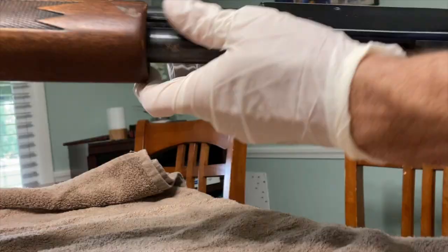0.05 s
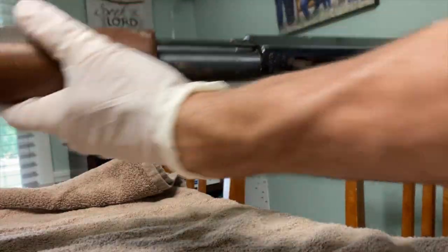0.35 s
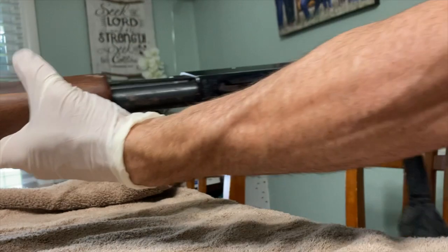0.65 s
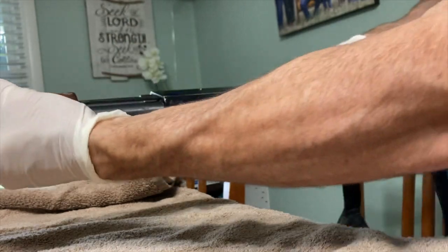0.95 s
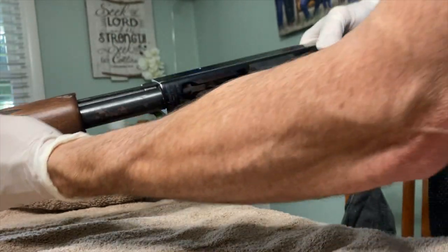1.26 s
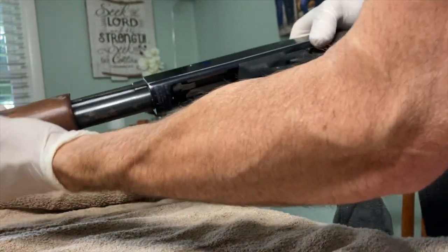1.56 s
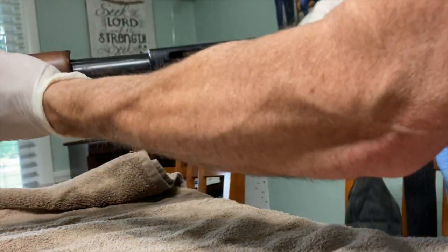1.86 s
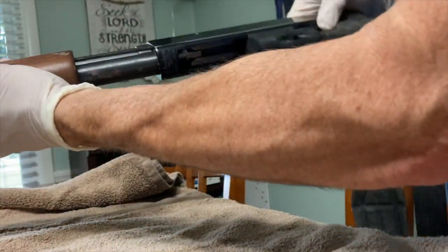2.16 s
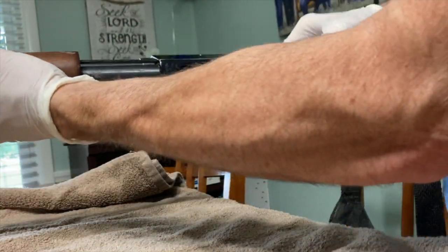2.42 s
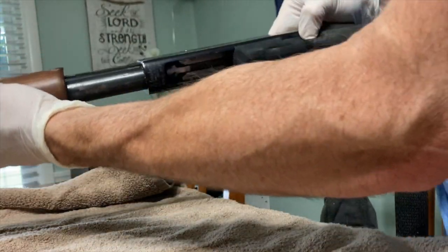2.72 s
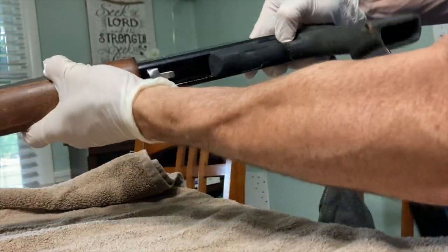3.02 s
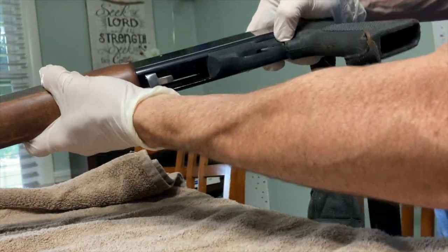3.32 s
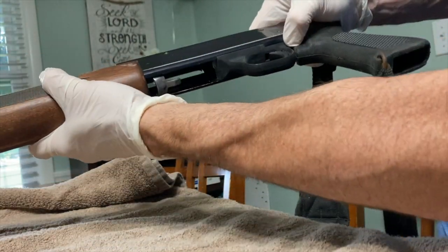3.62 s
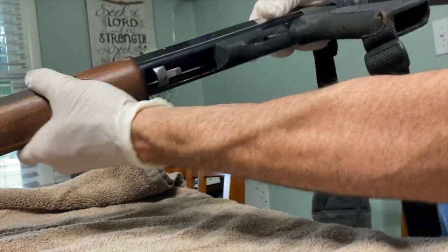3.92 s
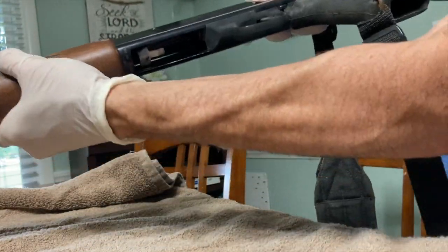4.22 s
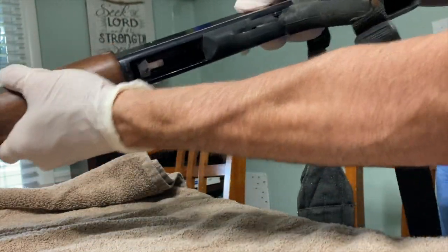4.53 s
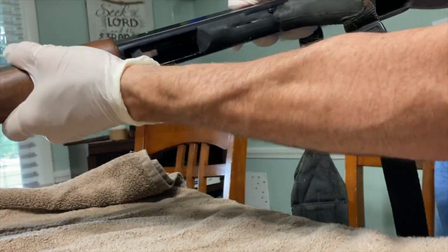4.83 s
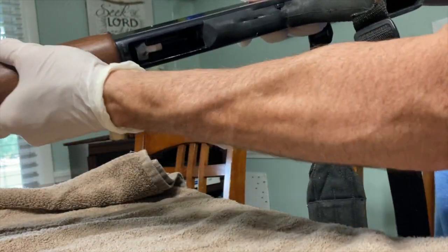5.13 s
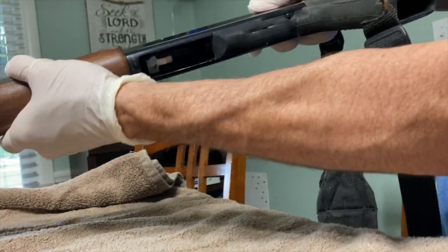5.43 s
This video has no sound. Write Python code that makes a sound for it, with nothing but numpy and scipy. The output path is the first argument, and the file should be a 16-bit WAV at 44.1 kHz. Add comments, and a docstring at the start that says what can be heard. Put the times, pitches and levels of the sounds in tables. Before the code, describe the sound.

Gloves rub and light clicks sound on a shotgun, then its slide slams back and closes slowly with metallic clicks and short scrapes.

```python
"""In a dining room, a pump shotgun is handled over a towel, then racked by hand.
Gloves rub the stock, the slide grinds back and slams into its stop, and the bolt is eased forward
in a run of steel clicks. Each click is a tiny rattle that sets steel and wood ringing; rubbing and
grinding are grainy noise. The room rings after each sound, and the ventilation hums underneath.
An automatic gain control turns the volume down under the slam."""
import sys
import numpy as np
from scipy import signal
from scipy.fft import rfft, irfft, next_fast_len
from scipy.io import wavfile
from scipy.ndimage import minimum_filter1d

SR = 44100
rng = np.random.default_rng(int(sys.argv[2]) if len(sys.argv) > 2 else 0)


def unload_wav(signal):
    """Save mono or channel-first audio to the path in sys.argv[1] as 16-bit WAV at rate SR, clipped to [-1, 1]."""
    wavfile.write(
        sys.argv[1],
        SR,
        np.round(np.clip(np.atleast_2d(signal).T, -1, 1) * 32767).astype(np.int16),
    )


N = 250252
TIME = np.arange(N) / SR
FFT_SIZE = next_fast_len(N + 2000)
FFT_HZ = np.arange(FFT_SIZE // 2 + 1) * SR / FFT_SIZE

# Parts meeting in the gun. Hardness below 0 is a wooden knock; high hardness is a bright steel snap.
# (time [s], relative level [dB], hardness [dB])
CLICKS = [(0.262, -40.5, -11), (0.4187, -32.5, -4), (0.5604, -43.5, -7), (.599, -41, -7.5),
          (1.0389, -34, 4), (1.0472, -33.5, -7.5), (1.2332, -36, -5.5), (1.2674, -34, -9),
          (1.2867, -36.5, -1.5), (1.4285, -33.5, -7.5), (1.4864, -14.5, 5.5), (2.283, -44, -3.5),
          (2.375, -48.5, 1), (2.3994, -50, 0), (2.4721, -34, 3), (2.4831, -31.5, -2), (2.6412, -34, -3.5),
          (2.7185, -24.5, -4), (2.819, -15.5, 0.5), (2.853, -21, 9.5), (2.859, -14.5, 6.5),
          (3.1281, -26, 14.5), (3.7884, -25, 2), (3.927, -42, 5), (3.9383, -34.5, 5), (3.9426, -25, 6),
          (4.069, -20.5, 10), (4.0765, -14.5, 6.5), (4.334, -35, -8), (4.3611, -20, 7), (4.3741, -30, 7),
          (4.382, -26.5, 2), (4.4842, -37.5, -14), (4.5327, -27.5, 2), (4.5352, -18.5, -1),
          (4.5784, -35, 5), (4.778, -23.5, -3.5), (4.795, -26, 1), (4.803, -16.5, 7), (4.8188, -23, 8.5),
          (4.9554, -34.5, -3.5), (4.97, -18, 5.5), (4.9767, -26, -1), (4.995, -31.5, 7), (5.252, -44.5, 6),
          (5.5042, -47, -14)]
# A mode is a tone that a part rings at; the narrower it is, the longer it rings.
# All four tables: (frequency [Hz], width [Hz], relative level [dB])
SMALL_PART_MODES = [(6150, 400, -4), (6820, 450, -1), (7600, 450, -1), (8300, 450, -8), (10450, 600, -1),
                    (11300, 600, -1), (12200, 550, -2), (15000, 800, -2)]   # bolt, lifter and latches
RECEIVER_MODES = [(1850, 300, -5), (2200, 300, -3), (2600, 320, -4), (3150, 300, 0), (3700, 350, -2),
                  (4400, 380, -1), (5200, 350, -6)]   # the steel body (receiver) and barrel
STOCK_MODES = [(540, 150, -7), (743, 150, -3), (980, 60, 0), (1160, 130, -1), (1400, 200, -2)]   # wooden stock and front grip
SPRING_MODES = [(1390, 14, -7), (3246, 12, -3), (3866, 12, -4), (4118, 14, -3), (4536, 12, -4),
                (6110, 12, 0), (6540, 14, -2), (7510, 12, -2), (10820, 14, -4), (11730, 14, -5)]   # magazine tube and spring
# short scraping pushes that ease the slide forward: (time of top speed [s], level [dB])
FORWARD_PUSHES = [(3.788, -50), (4.354, -36), (4.55, -34.5), (4.801, -35), (4.991, -38.5)]
# tone colour of the scraping slide: (frequency [Hz], relative level [dB])
SLIDE_SPECTRUM = [(200, -10), (550, 1), (1000, 3.5), (1600, 3), (2300, -3.5), (4000, 1.5), (5300, 7.5),
                  (7000, -1.5), (9200, -10), (11400, -0.5), (13600, -25), (15200, -8)]
# dull bumps of arms and gun: (time [s], relative level [dB], pitch [Hz], width [Hz], length [s])
HANDLING_BUMPS = [(.54, -47, 290, 195, 0.14), (.585, -39, 304, 231, 0.04), (.885, -50, 72.5, 40, 0.041),
                  (4.537, -33.5, 753, 255, 0.0046)]
# gloves and towel rubbing along the gun: (time [s], length [s], level [dB])
CLOTH_RUBS = [(0.153, .08, -61.5), (0.282, 0.83, -52), (0.761, 0.086, -50.5), (1.262, .05, -55),
              (1.931, 0.13, -64.5), (2.15, 0.11, -58), (2.34, .45, -72), (3.504, 0.22, -74),
              (3.799, .4, -59), (4.306, .6, -65), (5.56, .1, -56)]
# tone colour of that rubbing: (frequency [Hz], relative level [dB])
CLOTH_SPECTRUM = [(250, 1), (400, 10), (580, 8), (800, 0), (1200, 1.5), (1700, 3), (2300, 3), (4200, 1),
                  (5400, -1.5), (7300, 1), (11200, -1.5), (15200, -10)]
# the room's echo: (frequency [Hz], time to fade by 60 dB [s], level against the sound sent in [dB])
ROOM_ECHO = [(150, 0.27, -15), (490, 0.57, -4.5), (1040, 0.58, -7.5), (2200, 0.54, -2.5), (5050, 0.59, -10),
             (7740, 0.45, -13.5), (11400, 0.36, -15), (16000, 0.23, -20)]
# tone colour of the ventilation's rumble: (frequency [Hz], relative level [dB])
VENT_SPECTRUM = [(15, -37), (25, -13.5), (49, -6), (127, -7.5), (162, -4), (189, -7), (300, -7),
                 (437, -16.5), (476, -17), (501, -35), (537, -22), (1010, -35.5), (1350, -39), (1500, -38),
                 (1950, -60), (3300, -120)]
# the ventilation's tones: (frequency [Hz], relative level [dB])
VENT_TONES = [(161.5, -62), (296.1, -60.5), (355.3, -62)]
# how far the microphone's left opening (port) leads the right: (frequency [Hz], phase [radians])
LEFT_PORT_LEAD = [(0, 0), (1030, 0.46), (1460, 0.5), (2760, 9.5), (3360, 7), (5340, 10), (6550, 7.5),
                  (9650, 3), (10900, 0.77), (12000, 3), (13200, -3), (14300, -2.5), (15200, -0.5),
                  (16500, -10.5)]
# treble swallowed by hollows behind the ports: (frequency [Hz], width [Hz], depth [dB])
TREBLE_DIPS = [(9060, 830, -23), (13700, 1300, -21)]

# the fast back stroke: the slide speeds up under a steady pull, hits its stop and bounces once
PULL_S, STOP_S, BOUNCE_DELAY_S = 2.862, 2.929, .016


def clicks(rows, steel_db, wood_db, parts_db, touch_db, rebound_db, gap_s, rebound_count=2):
    """Parts touch lightly, hit home and rebound. Small parts ring first, then steel body, then wood."""
    out = np.zeros((3, N))   # left, right, into the room
    for start, level_db, hard_db in rows:
        touch = (start - gap_s * rng.uniform(0.55, 1.1), level_db + touch_db)
        waits = np.cumsum(gap_s * rng.uniform(0.55, 2, rebound_count))
        rebounds = [(start + wait, level_db + rebound_db) for wait in waits]
        chatter_s = 0.0028 * 2 ** (level_db / 40)   # a hit 40 dB lighter buzzes half as long
        small = struck_part(SMALL_PART_MODES, pan_db=-0.5, chatter_s=chatter_s, phase_spread=0.68)
        receiver = struck_part(RECEIVER_MODES, pan_db=7.0, chatter_s=1.3 * chatter_s, phase_spread=0.93)
        stock = struck_part(stock_modes(start), pan_db=6.0, chatter_s=1.4 * chatter_s, phase_spread=0.66)
        for s, db in [touch, (start, level_db)] + rebounds:
            add(out, s, from_db(db + hard_db + parts_db) * small)
            add(out, s + .0002, from_db(db + steel_db) * receiver)
            add(out, s + .0011, from_db(db - hard_db + wood_db) * stock)
    bass_cut = signal.butter(2, 280, "high", fs=SR, output="sos")   # the clicks carry little bass below about 280 Hz
    return signal.sosfilt(bass_cut, out)


def struck_part(modes, pan_db, chatter_s, phase_spread, size=1400):
    """Two parts buzz briefly as they meet and set the modes ringing. Rows: left, right, into the room."""
    t = np.arange(size) / SR
    chatter = rfft(rng.standard_normal(size) * np.sqrt(t) * np.exp(-(t / chatter_s) ** 2))
    flattened = chatter / np.sqrt(np.abs(chatter))   # hard hits reach every mode
    force = irfft(flattened, size) * np.exp(-t / chatter_s / 2)
    ring = ringing(modes, spread_db=0.77, phase_spread=phase_spread, size=size)
    sound = signal.fftconvolve(ring, force[None], axes=1)[:, :size]
    return np.vstack([pan(pan_db) * unit_rms(sound) / 2, sound_into_room(modes, size)])


def ringing(modes, spread_db, phase_spread, size):
    """A tapped part rings in fading tones, with a new mix each time and its own phases left and right."""
    hz, width_hz, db = np.transpose(modes)[:, :, None]
    t = np.arange(size) / SR
    gain = from_db(db + spread_db * rng.standard_normal(hz.shape)) * np.sqrt(width_hz)
    phase = rng.uniform(0, 2 * np.pi, hz.shape) + phase_spread * rng.standard_normal((2, len(hz), 1))
    return np.sum(gain * np.exp(-np.pi * width_hz * t) * np.sin(2 * np.pi * hz * t + phase), axis=1)


def sound_into_room(modes, size):
    """Added up over all directions, a part's modes blend into one click with a smooth tone colour."""
    hz, width_hz, db = np.transpose(modes)[:, :, None]
    bins_hz = np.arange(1, size // 2 + 2) * SR / size
    power = np.sum(from_db(db) ** 2 / width_hz * np.exp(-.5 * ((bins_hz - hz) / width_hz) ** 2), axis=0)
    pulse = np.roll(irfft(np.sqrt(power), size), size // 10)
    return unit_rms(pulse) / 2


def stock_modes(s, unlock_s=2.6, hollow_below_hz=900):
    """The front grip's hollow low tones are choked while the slide is locked and ring once it is loose."""
    hollow_db = -15.5 if s < unlock_s else 2
    return [(hz, width_hz, db + hollow_db * (hz < hollow_below_hz)) for hz, width_hz, db in STOCK_MODES]


def back_stroke(count=8, jolt_db=-8, slam_db=-4, bounce_db=-2.5, hard_db=10):
    """Rows for clicks(): the bolt jolts on its rails, harder as it speeds up, then slams and bounces."""
    progress = (np.arange(count) + 1 + rng.uniform(-.3, 0.34, count)) / (count + 1)
    times = PULL_S + (STOP_S - PULL_S) * progress
    jolts = [(s, jolt_db + 20 * np.log10(slide_speed(s)), hard_db) for s in times]
    return jolts + [(STOP_S, slam_db, hard_db), (STOP_S + BOUNCE_DELAY_S, bounce_db, hard_db)]


def slide_speed(s):
    """A steady pull speeds the slide up evenly; 1 is its speed at the stop."""
    return np.interp(s, [PULL_S, STOP_S], [.3, 1])


def slide_strength(grind_db=-15):
    """How hard steel scrapes on steel: it follows the back stroke's speed, then each forward push."""
    stroke_s = STOP_S + BOUNCE_DELAY_S - PULL_S
    grind = slide_speed(TIME) * swell(PULL_S, stroke_s, rise_db_per_s=600.5, fall_db_per_s=4000)
    pushes = sum(from_db(db) * swell(s, 0, rise_db_per_s=897, fall_db_per_s=396.5)
                 for s, db in FORWARD_PUSHES)
    return from_db(grind_db) * grind + pushes


def friction(strength, spectrum, likeness, grain_samples, grain_db=2.5):
    """Surfaces catch and let go in tiny grains of uneven strength."""
    grains = from_db(grain_db * np.clip(rng.standard_normal(N // grain_samples + 2), -2, 2))
    grip = np.interp(np.arange(N) / grain_samples, np.arange(len(grains)), grains)
    return strength * coloured(stereo_noise(likeness, N) * grip, spectrum)


def spring(shaking, db, size=SR // 2):
    """Every jolt leaves the magazine tube and its spring ringing thinly."""
    ring = ringing(SPRING_MODES, spread_db=1.0, phase_spread=0.83, size=size)
    return from_db(db) * signal.fftconvolve(shaking, unit_rms(ring) / np.sqrt(size), axes=1)[:, :N]


def gun_jumps(slam_hz=239, slam_width_hz=406, slam_s=0.0088,
              shove_hz=457, shove_width_hz=496, shove_s=0.0082):
    """Rows for bumps(): the gun jumps deeply at the slam and bounce, and lightly at each of CLICKS."""
    slams = [(s, db, slam_hz, slam_width_hz, slam_s)
             for s, db in [(STOP_S, -17), (STOP_S + BOUNCE_DELAY_S, -25.5)]]
    # a hard snap shoves the gun less
    shoves = [(s, db - max(hard_db, 0) - 19, shove_hz, shove_width_hz, shove_s)
              for s, db, hard_db in CLICKS]
    return slams + shoves


def bumps(rows):
    """Soft, padded blows: a short swell of force stirs one broad, low band of sound."""
    out, t = np.zeros((2, N)), TIME[:SR // 3]
    for s, db, hz, width_hz, length_s in rows:
        middle = np.hypot(hz, width_hz / 2)
        band = signal.butter(2, [middle - width_hz / 2, middle + width_hz / 2], "band", fs=SR, output="sos")
        force = stereo_noise(0.92, len(t)) * np.sqrt(t) * np.exp(-2 * t / length_s)
        thud = signal.sosfilt(band, signal.sosfilt(band, force))
        add(out, s, from_db(db) * unit_rms(thud) * np.sqrt(length_s / t[-1]))
    return out


def rub_strength():
    """How hard gloves and towel rustle; rubs that overlap add their power."""
    rubs = [from_db(db) * swell(s, length_s, rise_db_per_s=402, fall_db_per_s=130)
            for s, length_s, db in CLOTH_RUBS]
    return np.sqrt(sum(rub ** 2 for rub in rubs))


def loose_ticks(rub, count=6, level_db=-48.5, spread_db=2.5):
    """Rows for clicks(): loose parts tick by chance, most likely where the hands rub hardest."""
    effort = np.cumsum(rub ** 2)
    times = np.interp(rng.random(count), effort / effort[-1], TIME)
    return [(s, level_db + spread_db * rng.standard_normal(), 0) for s in times]


def room(x, build_up_s=.002, size=SR * 3 // 4):
    """Echoes from all around build up quickly, then each frequency band fades at its own pace."""
    t, hz = TIME[:size], np.arange(size // 2 + 1) * SR / size
    white, echo = rfft(rng.standard_normal((2, size))), 0
    build_up = 1 - np.exp(-(t / build_up_s) ** 2)
    edges_hz = np.geomspace(60, 18000, 18)
    for low, high in zip(edges_hz, edges_hz[1:]):
        centre = np.sqrt(low * high)
        decay = from_db(-60 * t / at_hz(ROOM_ECHO, centre)) * build_up
        band = irfft(white * ((hz >= low) & (hz < high)), size)
        gain = from_db(at_hz(ROOM_ECHO, centre, column=2))
        echo = echo + gain * band * decay / np.sqrt(np.sum(decay ** 2))
    return signal.fftconvolve(x[None], echo, axes=1)[:, :N]


def ventilation(rumble_db=-55.5, tone_gain_db=-2.5, hiss_db=-94):
    """The ventilation rumbles with a few wavering tones, over a faint hiss."""
    waver = np.cumsum(rng.standard_normal((len(VENT_TONES), N)), axis=1) * np.sqrt(25 / SR)
    tones = sum(from_db(db + tone_gain_db) * np.sin(2 * np.pi * hz * TIME + phase)
                for (hz, db), phase in zip(VENT_TONES, waver))
    rumble = from_db(rumble_db) * coloured(stereo_noise(0.65, N), VENT_SPECTRUM)
    return rumble + tones + from_db(hiss_db) * stereo_noise(.2, N)


def port_paths(x):
    """Sound reaches the two microphone ports by slightly different paths."""
    phase_turn = np.exp(.5j * at_hz(LEFT_PORT_LEAD, FFT_HZ))
    return filtered(x, np.array([phase_turn, phase_turn.conj()]))


def port_hollows(x):
    """Hollows behind the microphone ports swallow two treble bands."""
    for hz, width_hz, depth_db in TREBLE_DIPS:
        swallowed = signal.lfilter(*signal.iirpeak(hz, hz / width_hz, fs=SR), x)
        x = x - (1 - from_db(depth_db)) * swallowed
    return x


def gain_control(x, threshold_db, hold_s, release_db_per_s, smoothing_s=0.063):
    """The volume drops while the sound stays loud, waits, and creeps back."""
    memory = np.exp(-1 / (smoothing_s * SR))
    power = signal.lfilter([1 - memory], [1, -memory], np.mean(x ** 2, axis=0))
    excess_db = np.maximum(10 * np.log10(power + 1e-12) - threshold_db, 0)
    hold = int(hold_s * SR) // 2 * 2 + 1   # an odd number of samples
    held_db = -minimum_filter1d(-excess_db, hold, origin=hold // 2)
    cut_db = np.maximum.accumulate(held_db + release_db_per_s * TIME) - release_db_per_s * TIME
    return x * from_db(-cut_db)


def swell(start_s, hold_s, rise_db_per_s, fall_db_per_s):
    """Strength of one movement: it rises to 1 at start_s, holds, and dies away."""
    early = np.maximum(start_s - TIME, 0)
    late = np.maximum(TIME - start_s - hold_s, 0)
    return from_db(-np.minimum(rise_db_per_s * early + fall_db_per_s * late, 200))


def from_db(db):
    """Turn decibels into a number to multiply by."""
    return 10 ** (np.asarray(db) / 20)


def unit_rms(x):
    """Scale a sound so its average level (rms) is 1."""
    return x / np.sqrt(np.mean(x ** 2) + 1e-30)


def at_hz(table, hz, column=1):
    """Read between a table's rows on a log-frequency scale."""
    table = np.array(table)
    return np.interp(np.log(np.maximum(hz, 1)), np.log(table[:, 0]), table[:, column])


def add(out, s, piece):
    """Mix a piece in at time s."""
    start = int(s * SR)
    out[:, start:start + piece.shape[1]] += piece[:, :N - start]


def pan(db):
    """Left and right gains, with the left louder by db."""
    return from_db(np.array([[db], [-db]]) / 2)


def stereo_noise(likeness, size):
    """White noise; likeness runs from 0 (left and right unrelated) to 1 (the same)."""
    shared = np.sqrt(likeness) * rng.standard_normal(size)
    return shared + np.sqrt(1 - likeness) * rng.standard_normal((2, size))


def coloured(x, spectrum):
    """Give x the tone colour in a table, at an average level of 1."""
    return unit_rms(filtered(x, from_db(at_hz(spectrum, FFT_HZ))))


def filtered(x, response):
    """Multiply each frequency in x by its own factor."""
    return irfft(rfft(x, FFT_SIZE) * response, FFT_SIZE)[..., :N]


def scene():
    """Clicks, scraping, rustle and thuds reach the microphone directly and by way of the room."""
    rub = rub_strength()
    handling = clicks(CLICKS + loose_ticks(rub), steel_db=-9.5, wood_db=-16, parts_db=-11.5,
                      touch_db=-22, rebound_db=-15, gap_s=0.0044)
    racking = clicks(back_stroke(), steel_db=-9.5, wood_db=-13.5, parts_db=-12.5,
                     touch_db=-8.0, rebound_db=-6.0, gap_s=0.002)
    hits = handling + racking
    slide = friction(slide_strength(), SLIDE_SPECTRUM, likeness=0.76, grain_samples=60)
    gloves = friction(rub, CLOTH_SPECTRUM, likeness=0.17, grain_samples=150)
    gun = hits[:2] + pan(1.3) * slide
    gun = gun + spring(gun, db=-21.0)
    thuds = bumps(HANDLING_BUMPS + gun_jumps())
    direct = port_paths(gun + pan(2.8) * gloves) + thuds
    into_room = hits[2] + slide[0] + gloves[0] + from_db(-2.5) * thuds[0]
    return direct + room(into_room) + ventilation()


def record(dry, cutoff_hz=16200):
    """The microphone colours the sound, loud moments are turned down, and the top treble is cut."""
    steady = gain_control(port_hollows(dry), threshold_db=-22.5, hold_s=0.045, release_db_per_s=82)
    return signal.sosfilt(signal.ellip(10, .3, 80, cutoff_hz, fs=SR, output="sos"), steady)


dry = scene()
out = record(dry)
unload_wav(out)
```